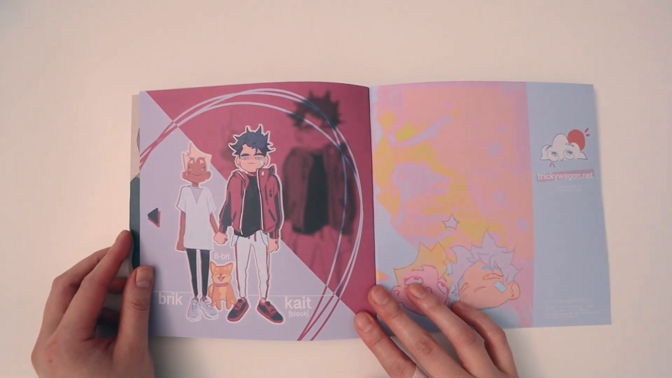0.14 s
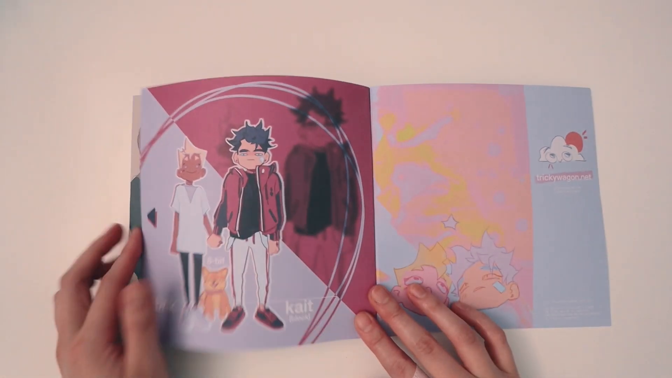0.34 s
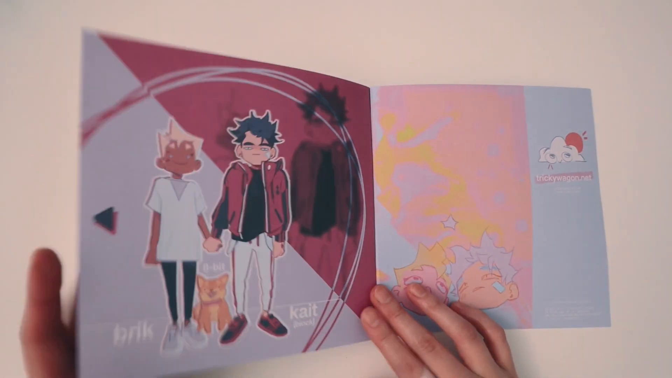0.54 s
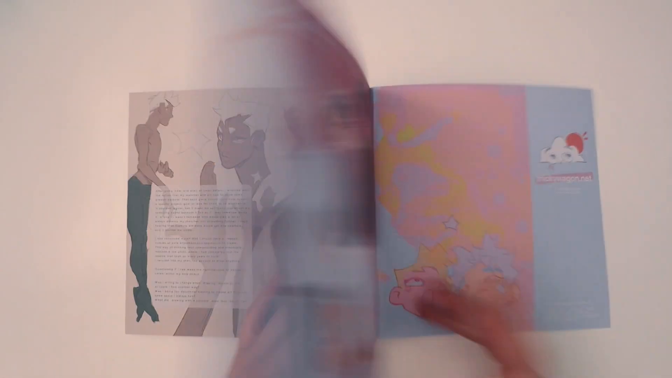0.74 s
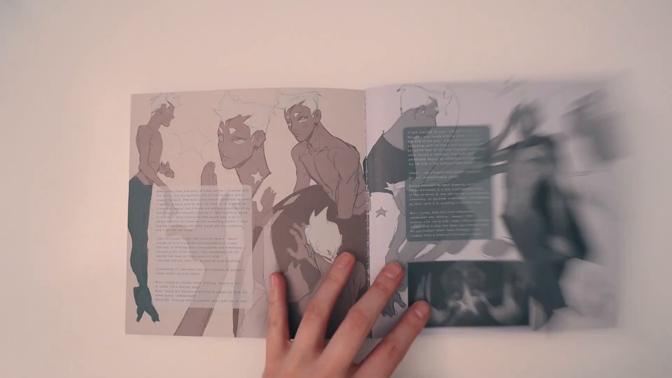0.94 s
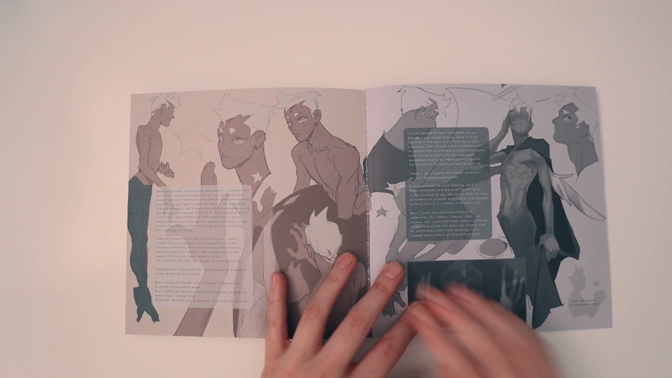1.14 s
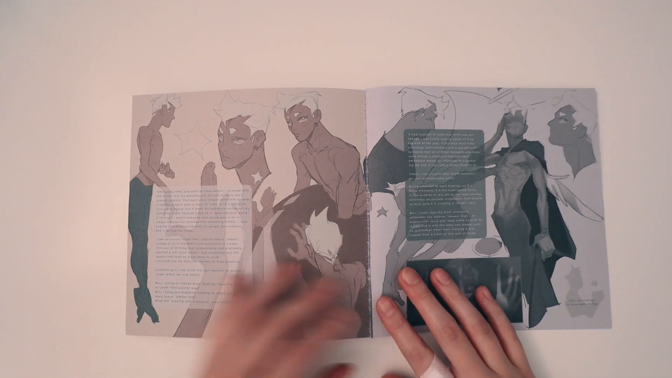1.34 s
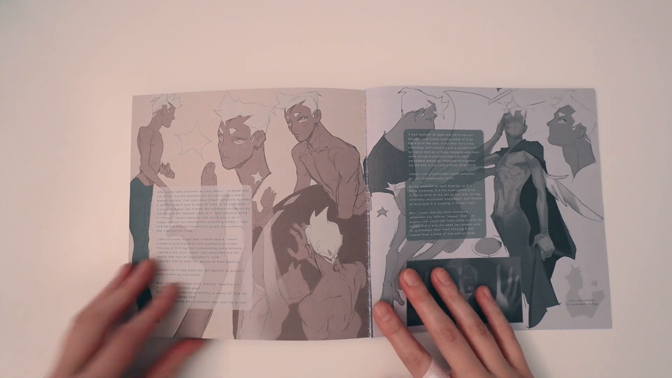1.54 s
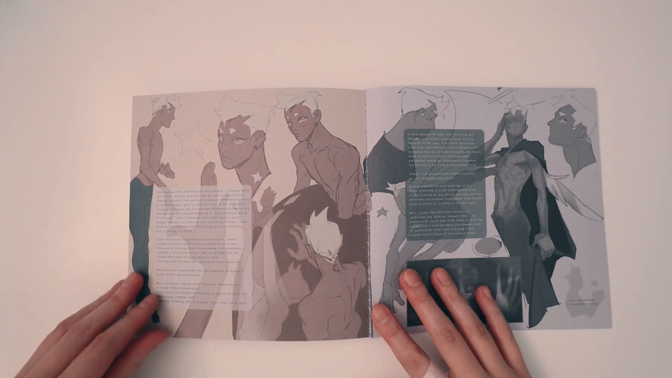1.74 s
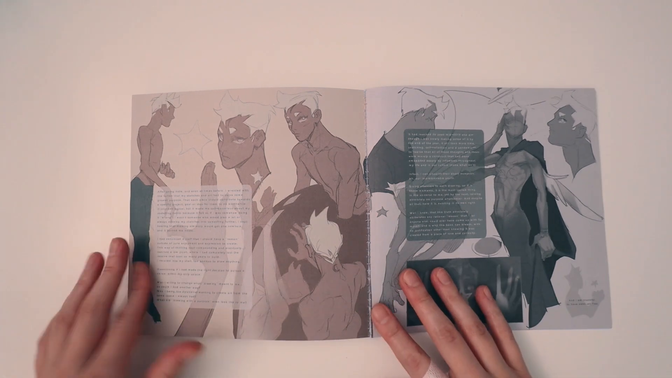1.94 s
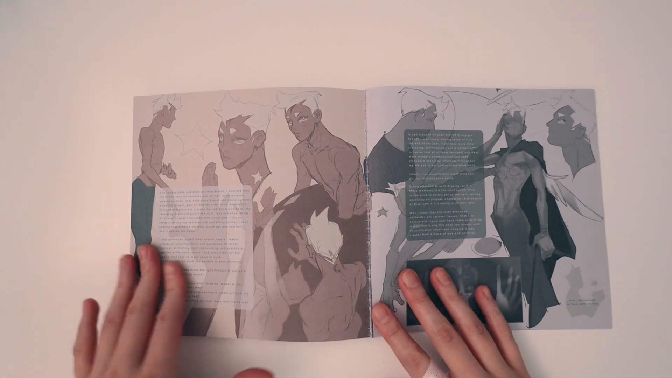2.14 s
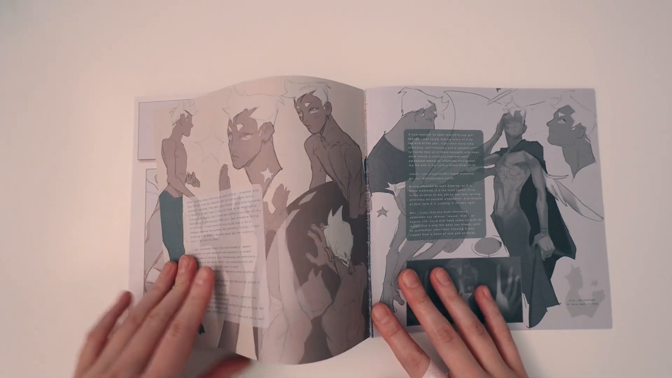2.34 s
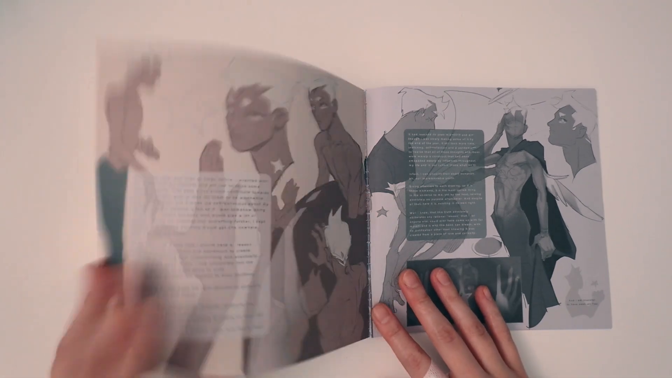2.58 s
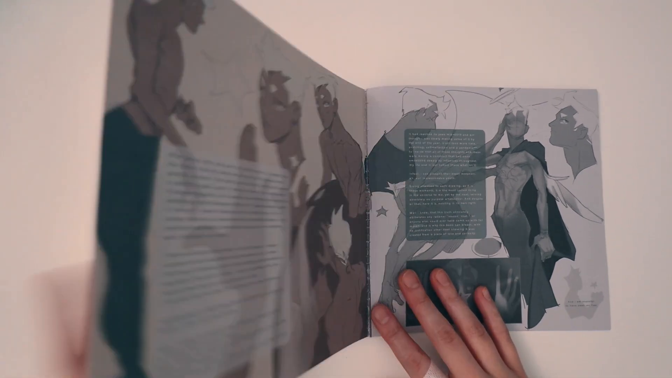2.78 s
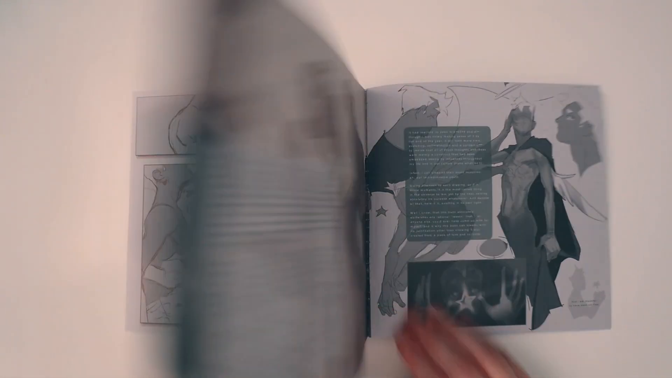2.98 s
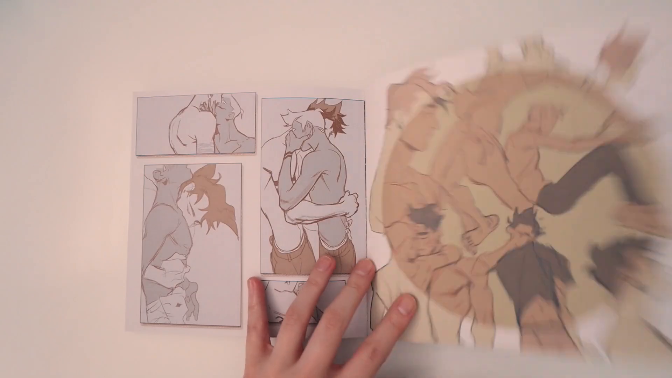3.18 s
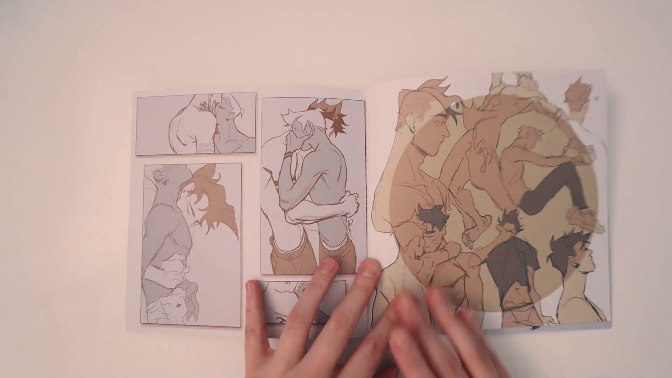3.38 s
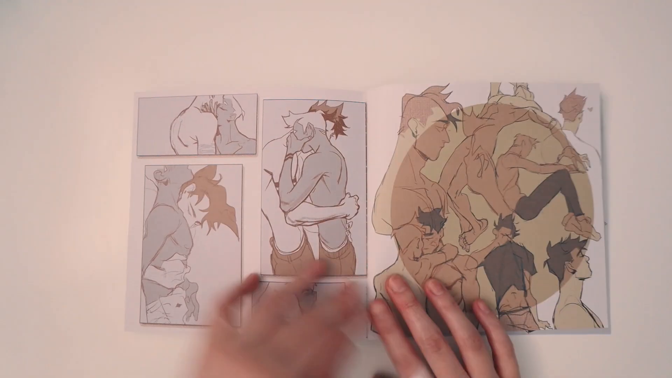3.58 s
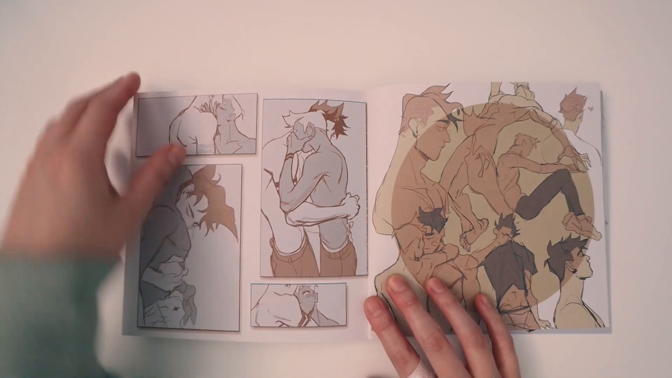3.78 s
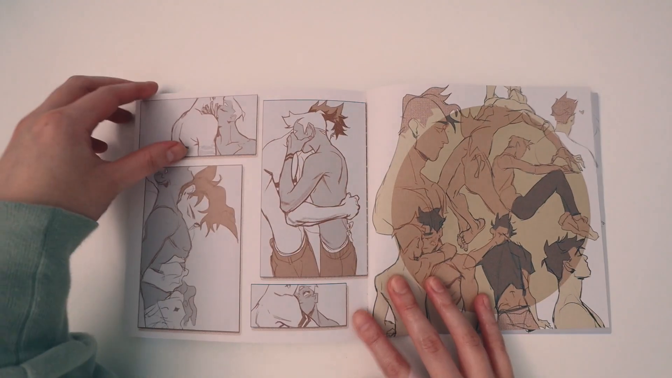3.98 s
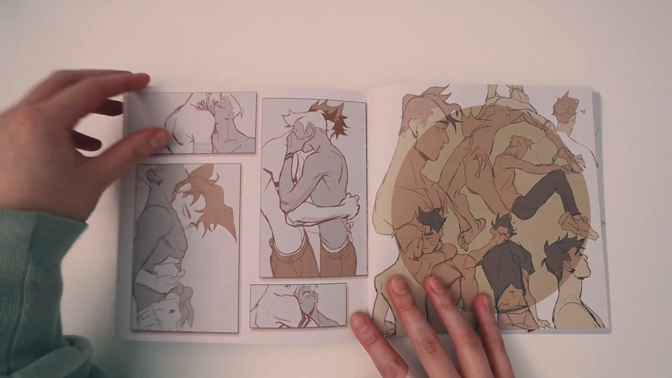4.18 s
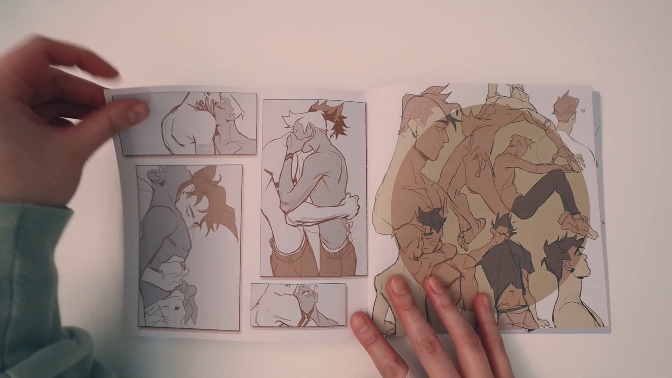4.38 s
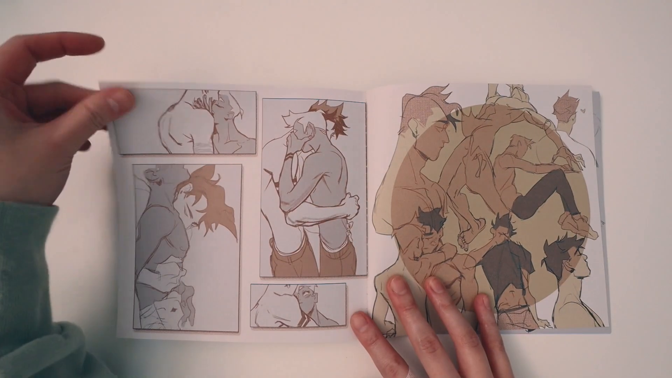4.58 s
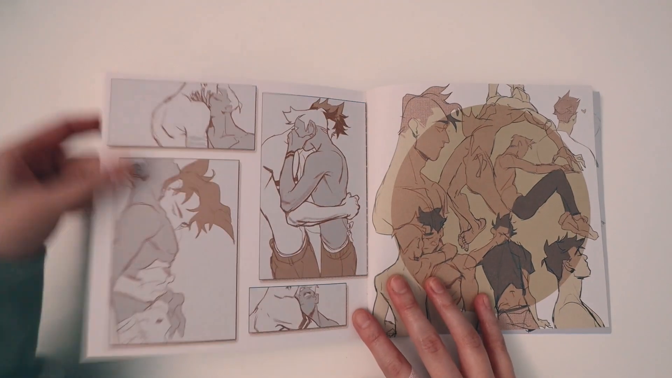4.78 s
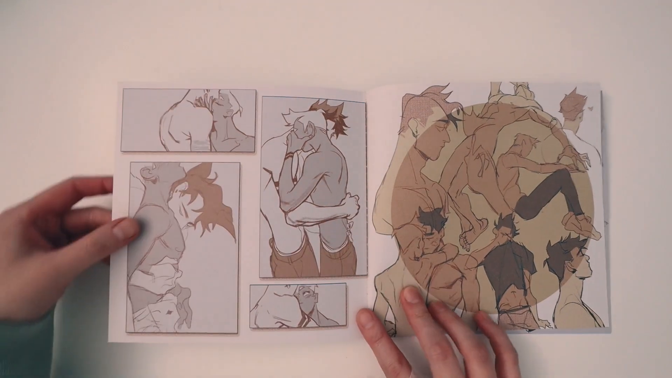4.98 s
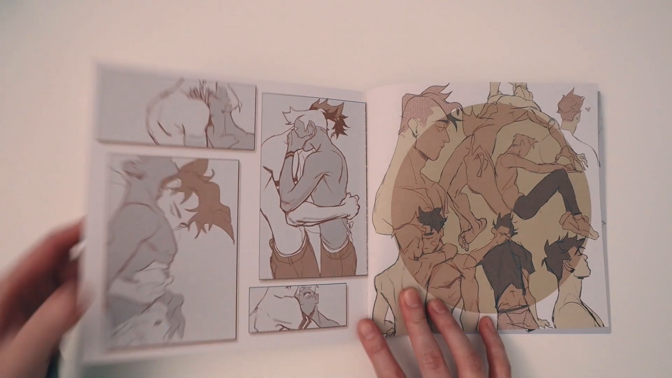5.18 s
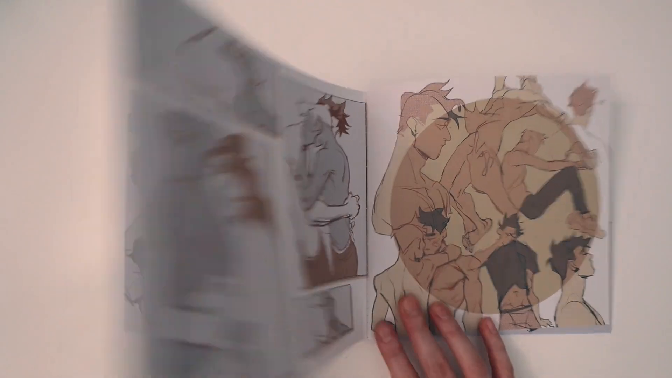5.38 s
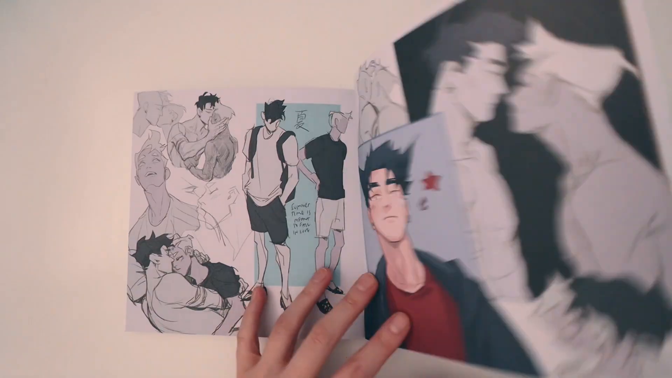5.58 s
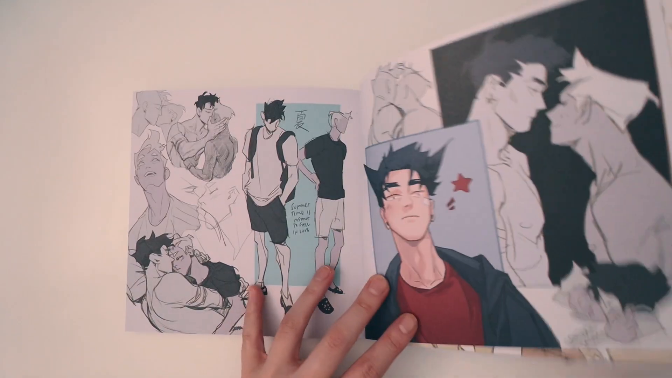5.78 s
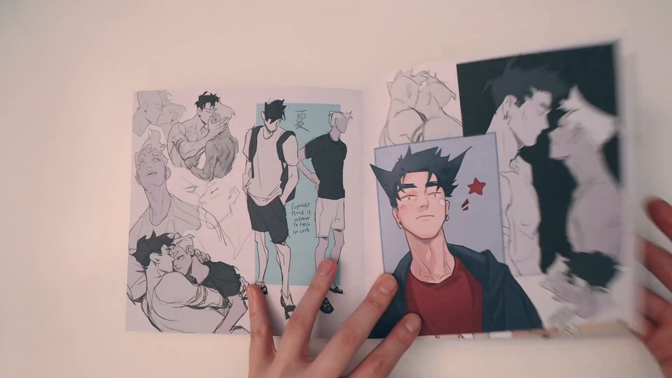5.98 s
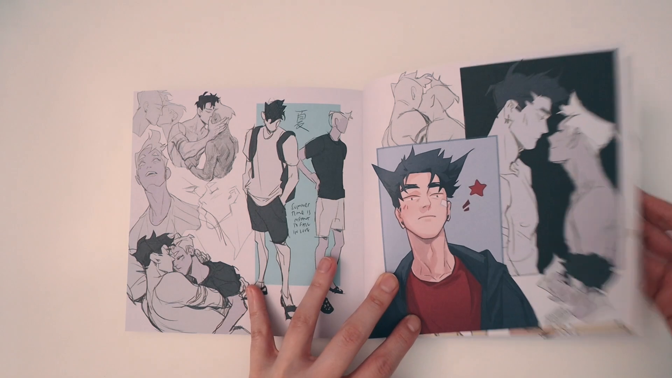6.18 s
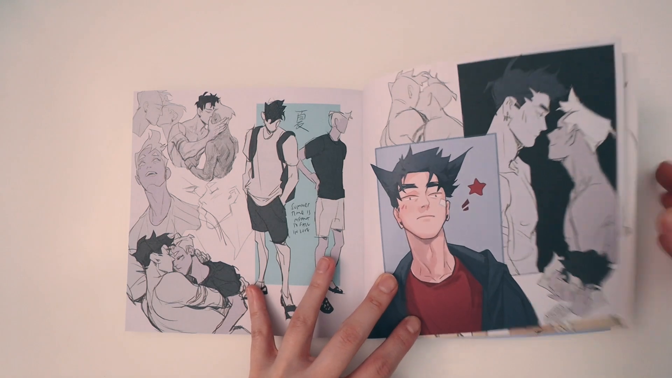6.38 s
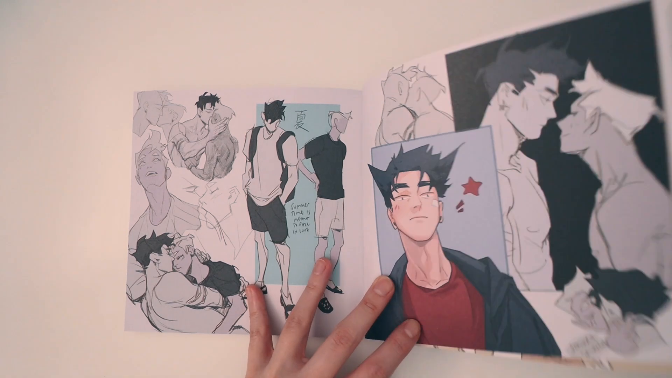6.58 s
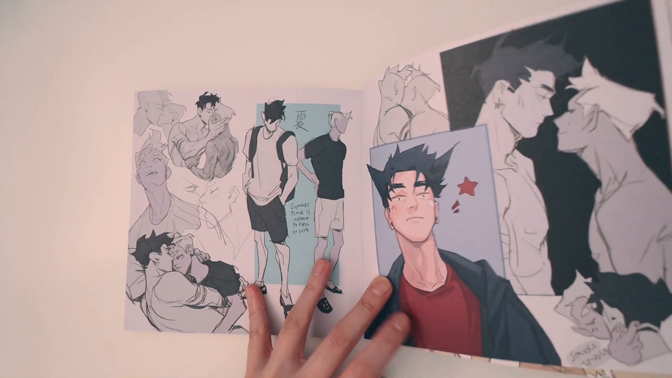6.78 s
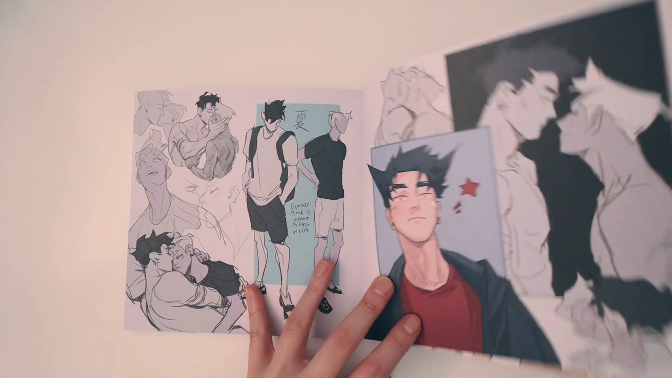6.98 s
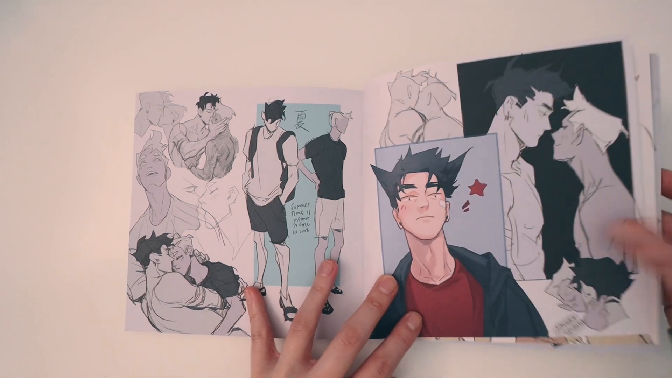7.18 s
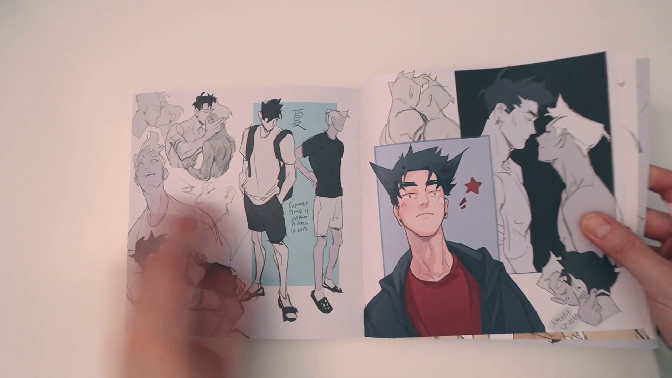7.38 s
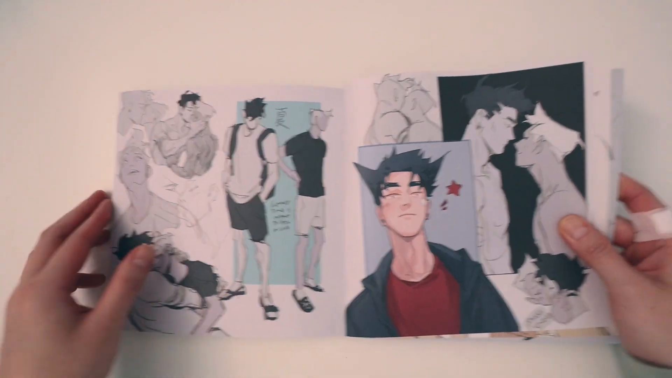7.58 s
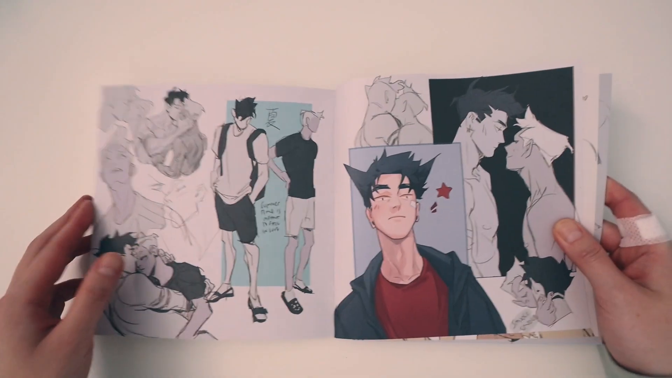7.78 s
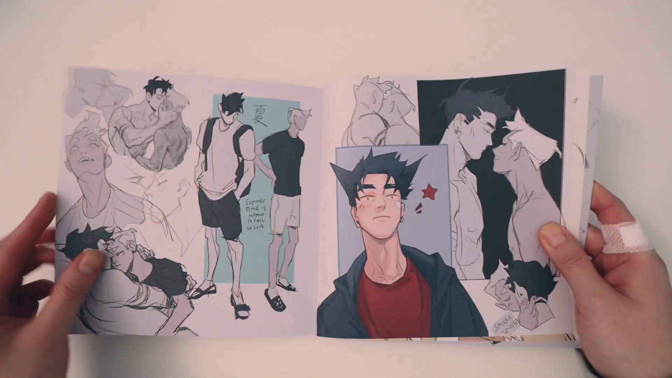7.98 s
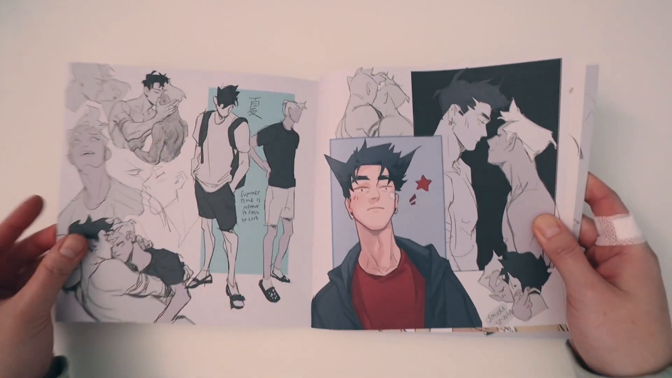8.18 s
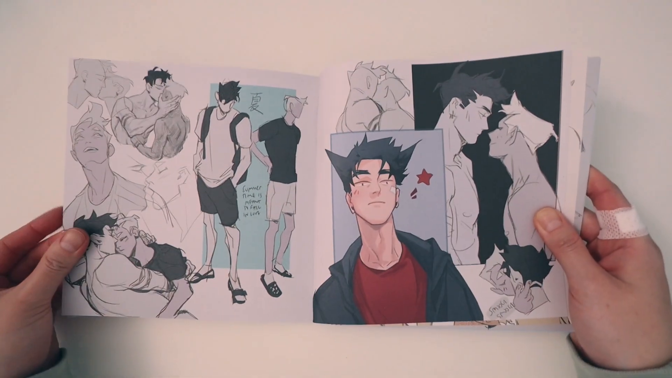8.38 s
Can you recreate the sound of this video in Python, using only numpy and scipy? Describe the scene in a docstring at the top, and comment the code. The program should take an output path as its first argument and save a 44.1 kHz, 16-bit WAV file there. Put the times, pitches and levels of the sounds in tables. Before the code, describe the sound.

Close stereo pickup of a paper book being handled on a desk, slight room reflection, low background hiss. Fingers rub the sheets, a page snaps over and is stroked flat; a sheet skids and buckles before a second, louder turn; quieter fumbling leads to a third. Then come irregular crinkles and a sharp snap with a thump as the held pages flex, ending in soft, dull dragging.

```python
"""A quiet, hissing room; then fingers slide over stiff pages of a picture book on a desk, close by.
Sheets hiss over their neighbours (filtered noise), pop and buckle (runs of ringing snaps) and skid (gliding noise);
edges tick (tiny bright snaps), fingertips thump the book (short decaying tones), palms smooth the turned pages.
At the end the book is dragged over the desk (duller noise). The desk rings along, and a small room answers."""
import sys
import numpy as np
from scipy import signal
from scipy.fft import rfft, irfft, next_fast_len
from scipy.io import wavfile
from scipy.ndimage import uniform_filter1d

SR = 44100
rng = np.random.default_rng(int(sys.argv[2]) if len(sys.argv) > 2 else 0)


def to_wav(sig):
    """Store sig (one row per channel, or 1-D mono) as 16-bit WAV at the path in sys.argv[1].

    Samples outside -1..1 are clipped; the rate is SR.
    """
    pcm = np.clip(np.atleast_2d(sig), -1, 1) * 32767
    pcm = np.round(pcm).astype(np.int16)
    wavfile.write(sys.argv[1], SR, pcm.T)  # frames by channels


N = 372644  # samples

SNAP_HZ = 1000  # a snap or crease of this pitch has its spectrum unshifted


def undb(db):
    """Decibels to gain."""
    return 10 ** (np.asarray(db) / 20)


def unit(x):
    """Scale to rms 1."""
    return x / np.sqrt(np.mean(x ** 2))


def clock(seconds):
    """Sample times of a stretch of sound."""
    return np.arange(max(int(seconds * SR), 8)) / SR


def add(out, s, x):
    """Mix a stereo sound in at time s."""
    i = int(np.clip(s * SR, 0, N - 1))
    out[:, i:i + x.shape[1]] += x[:, :N - i]


def colour(x, points, shift=1, tilt_db=0, size=2048):
    """Causal filter with the given spectrum, shifted in pitch and tilted per octave about 1024 Hz."""
    hz, db = np.transpose(points)
    octave = np.log2(np.maximum(np.arange(size // 2 + 1) * SR / size, 20))
    level_db = np.interp(octave, np.log2(hz * shift), db) + tilt_db * (octave - 10)
    # folding the cepstrum forward makes the filter minimum-phase
    cepstrum = irfft(np.log(undb(level_db)))
    cepstrum[1:size // 2] *= 2
    cepstrum[size // 2 + 1:] = 0
    impulse = irfft(np.exp(rfft(cepstrum)))
    return signal.fftconvolve(x, impulse[None], axes=1)


def walk(count, rate):
    """Smooth chance with a spread near 1, taking a new value rate times a second."""
    k = max(int(SR / rate), 1)
    steps = np.repeat(rng.standard_normal(count // k + 1), k)
    return uniform_filter1d(steps, k)[:count] * np.sqrt(2)


def diffuse(count, apart_hz=700):
    """Noise from all sides: the two ports agree in the bass and part in the treble."""
    mid, side = rng.standard_normal((2, count))
    side = signal.sosfilt(signal.butter(1, apart_hz, "high", fs=SR, output="sos"), side)
    return np.array([mid + side, mid - side])


# noise spectrum of the idle room and microphone: [f/Hz, relative level/dB]
AIR = [(25, 5.5), (202, 3), (543, -6.5), (1150, -7.5), (3830, -15), (9270, -30.5), (11200, -26),
       (13100, -41), (15000, -53)]
AIR_DB = -58


def air(waver_db=1.26):
    """The quiet room and the microphone's hiss: coloured noise with a slowly wavering level."""
    return unit(colour(diffuse(N), AIR)[:, :N]) * undb(AIR_DB + waver_db * walk(N, rate=4.6))


# fingers slide a sheet over its neighbour: [t of the peak/s, level/dB, length/s, tilt/(dB per octave)]
SWIPES = [(0.326, -59, 0.12, -0.5), (0.543, -46, 0.074, -2), (1.336, -53.5, 0.15, 10),
          (1.917, -56.5, 0.052, 1), (2.123, -62, 0.3, 2.5), (2.66, -39, 0.14, -1), (3.221, -52, 0.2, -0.1),
          (4.009, -58, 0.1, 2), (4.4, -48.5, 0.04, -0.5), (4.92, -51, 0.19, -1), (5.4, -46.5, 0.16, 0.5),
          (6.068, -60.5, 0.1, -2), (6.626, -53, 0.38, -0.5), (7.347, -56, 0.22, 1),
          (8.069, -59.5, .045, 0.3), (8.422, -71, .045, -1)]
# a sheet passes over the spine, then a palm flattens it:
# [t when upright/s, swish level/dB, wait for the palm/s, palm tilt/(dB per octave)]
TURNS = [(.80, -47.5, .74, 3.5), (3.03, -47.5, .56, 4), (5.49, -46, .59, -2)]
SWISH_RISE_S, SWISH_FALL_S, SWISH_TILT_DB = .15, 0.13, 1.5
FLATTEN_S, FLATTEN_DB = 0.21, -53.5


def page_strokes():
    """Fingers slide the sheets; each turn swishes over the spine and is flattened by a palm."""
    strokes = [slide(*row) for row in SWIPES]
    for s, db, wait, tilt_db in TURNS:
        strokes.append((s, db, SWISH_RISE_S, SWISH_FALL_S, SWISH_TILT_DB))
        strokes.append(slide(s + wait, FLATTEN_DB, FLATTEN_S, tilt_db))
    return strokes


# noise spectrum of paper rubbing on paper: [f/Hz, relative level/dB]
RUB = [(200, -13.5), (500, -15), (1000, 3), (4500, -0.5), (7000, -5.5), (11000, -7.5), (12500, -7),
       (15000, -44)]


def rubbing_pages():
    """Sheets, fingers and palms rub on paper, a bright judder of fibre slips."""
    return friction(page_strokes(), RUB, grain_db=2.5, judder_db=2.0, width=0.38)


RISE_SHARE = .47  # of a stroke's length


def slide(s, db, length, tilt_db):
    """A hand stroke that speeds up and slows down within its length."""
    return s, db, length * RISE_SHARE, length * (1 - RISE_SHARE), tilt_db


def stroke(s, rise, fall, flatness=1.5):
    """Times around the peak of a hand stroke, and the hand's speed at each."""
    lead = min(s, rise * 2)
    t = clock(lead + fall * 2) - lead
    return t, np.exp(-np.abs(t / np.where(t < 0, rise, fall)) ** flatness)


def rasp(count, patches, grain_db):
    """Tiny slips on each patch of a sheet, with forces that vary together."""
    return rng.standard_normal((patches, count)) * undb(grain_db * walk(count, rate=2500))


def friction(strokes, spectrum, grain_db, judder_db, width, count=3):
    """Fibres catch and slip by the thousand; the stroke swells, judders and dies with the hand's speed."""
    out = np.zeros((2, N))
    for s, db, rise, fall, tilt_db in strokes:
        t, speed = stroke(s, rise, fall)
        slips = rasp(len(t), count, grain_db)
        hiss = unit(ports(colour(slips, spectrum, tilt_db=tilt_db), s, width)[:, :len(t)])
        add(out, s + t[0], hiss * speed * undb(db + judder_db * walk(len(t), rate=67.4)))
    return out


# places run from -1 right to 1 left
LIFT_PLACE, LAND_PLACE, DRAG_PLACE = -0.61, 0.76, 0.26
CROSS_S, STAY_S, RETURN_S = 0.43, 0.33, 0.45


def place_at(s):
    """The sound crosses with each sheet, stays, follows the hand back; at last the whole book is in the middle."""
    path = []
    for upright, *_ in TURNS:
        landed = upright + CROSS_S / 2
        leaves = landed + STAY_S
        path += [(landed - CROSS_S, LIFT_PLACE), (landed, LAND_PLACE)]
        path += [(leaves, LAND_PLACE), (leaves + RETURN_S, LIFT_PLACE)]
    pushed = DRAGS[0][0]
    path[-2:] = [(pushed - RETURN_S, LAND_PLACE), (pushed, DRAG_PLACE)]  # the last sheet stays in the hand
    return np.interp(s, *np.transpose(path))


PORT_LAG_S, PORT_DB = 0.00018, 4.5  # between the two ports, for a sound at place 1


def ports(x, s, width):
    """Patches of a sheet lie side by side; each reaches the nearer port earlier and louder."""
    place = place_at(s) + width * np.linspace(-1, 1, len(x))
    size = next_fast_len(x.shape[1] + 64)
    spectrum, hz = rfft(x, size), np.arange(size // 2 + 1) * SR / size
    lead = place[:, None] / 2 * (np.log(undb(PORT_DB)) + 2j * np.pi * hz * PORT_LAG_S)
    return np.array([irfft((spectrum * np.exp(side * lead)).sum(0), size) for side in (1, -1)])


# a whole sheet pops over or lands: [t/s, level/dB, f/Hz, rebound re level/dB, rebound length/s,
# edge tick level/dB, thump level/dB]
FLOPS = [(0.559, -29, 940, -7.5, 0.035, -52, -60), (.929, -22.5, 1220, -11, 0.015, -28, -66),
         (2.684, -26.5, 1510, 2, .022, -25.5, -43), (2.764, -30.5, 890, -25, 0.026, -40, -36),
         (2.941, -29.5, 1210, 4, .015, -31, -24), (5.667, -35, 930, -8, .036, -59, -34),
         (5.806, -25.5, 1440, -1.5, .035, -37, -37)]
# spectrum of a snapping sheet at SNAP_HZ: [f/Hz, relative level/dB]
SNAP = [(40, -17.5), (220, -9.5), (450, -5), (750, 2), (1100, 1), (1650, -1.5), (2500, -14), (4000, -25),
        (16000, -53)]
FLOP_S, FLOP_THUMP_HZ, EDGE_LEAD_S = .018, 235, .004
REBOUND_AFTER_S, REBOUND_PITCH = .018, 0.7  # pitch as a ratio to the first pop


def flops():
    """The edge ticks, the sheet pops through and thumps the stack, then rebounds at a lower pitch."""
    pops, edges, blows = [], [], []
    for s, db, hz, rebound_db, rebound_s, edge_db, thump_db in FLOPS:
        pops.append((s, db, FLOP_S, hz))
        pops.append((s + REBOUND_AFTER_S, db + rebound_db, rebound_s, hz * REBOUND_PITCH))
        edges.append((s - EDGE_LEAD_S, edge_db))
        blows.append((s + EDGE_LEAD_S, thump_db, FLOP_THUMP_HZ))
    return flexes(pops, SNAP) + ticks(edges) + thumps(blows)


def flexes(rows, spectrum, small=False):
    """A bent sheet pops through in snaps, coloured at its pitch; slow bends snap more sparsely."""
    out = np.zeros((2, N))
    for s, db, length, hz in rows:
        rate = 60 / np.sqrt(length)  # snaps per second
        snaps = crackle(length, rate, scatter_db=4.0, first=0.75, ring_s=.0035, ring=0.89, alike=small)
        pop = ports(colour(snaps, spectrum, hz / SNAP_HZ), s, width=0.27)
        add(out, s, burst(pop, db, length))
    return out


def crackle(length, rate, scatter_db, first, ring_s, ring, alike=False, count=3, fade_db=-6):
    """One snap sets off a dying run of others on a few patches, each ringing briefly in dense modes."""
    t = clock(length + 6 * ring_s)
    snaps = np.zeros((count, len(t)))
    n = int(length * rate) + 2
    due = (np.arange(n) + rng.random(n)) / n  # share of the length
    when = (due * length * SR).astype(int)
    size = undb(scatter_db * rng.standard_normal(n) + fade_db * due) * rng.choice([-1, 1], n)
    when[0], size[0] = 10, first
    snaps[rng.integers(count, size=n), np.minimum(when, len(t) - 1)] = size
    # noise tails stand for the modes: one per patch, or one for all if alike
    tail = rng.standard_normal((1 if alike else count, len(t))) * np.exp(-t / ring_s)
    tail *= ring / np.linalg.norm(tail, axis=1, keepdims=True)
    tail[:, 0] = 1
    return signal.fftconvolve(snaps, tail, axes=1)[:, :len(t)]


def burst(x, db, length):
    """Give a burst the energy of level db held for its length."""
    return x * undb(db) * np.sqrt(2 * length * SR / np.sum(x ** 2))


# a fingertip or the book's edge lands: [t/s, peak level before panning/dB, f/Hz]
THUMPS = [(.781, -38.5, 195), (1.408, -47, 217), (1.944, -41.5, 99), (2.131, -42, 151), (2.775, -31.5, 137),
          (3.475, -43, 135), (3.653, -46.5, 107), (3.905, -43, 195), (4.046, -46.5, 207),
          (4.853, -41.5, 210), (4.924, -40, 220), (6.254, -33.5, 230.5), (6.629, -28.5, 271),
          (6.892, -37, 210), (7.305, -33.5, 356), (7.388, -31.5, 323), (8.122, -39, 216)]


def thumps(rows, cycles=0.81, pat=0.36):
    """A soft landing rocks the page stack for a cycle or two, with a small pat of skin on paper."""
    out, t = np.zeros((2, N)), clock(0.071)
    for s, db, hz in rows:
        age = 2 * hz * t / cycles  # the swell peaks at age 1
        skin = unit(colour(rng.standard_normal((1, len(t))), SNAP, 2 * hz / SNAP_HZ)[:, :len(t)])
        thud = age * np.exp(1 - age) * (np.sin(2 * np.pi * hz * t) + pat * skin)
        add(out, s, undb(db) * ports(thud / np.abs(thud).max(), s, width=0))
    return out


# a held sheet buckles: [t/s, level/dB, length/s, f/Hz]
BUCKLES = [(0.953, -25, 0.0041, 1550), (0.997, -40, 0.03, 1060), (1.261, -42.5, 0.01, 1180),
           (1.301, -39, 0.0058, 1550), (1.356, -36.5, 0.0034, 1400), (2.49, -43.5, 0.035, 660),
           (2.61, -36.5, 0.0057, 1250), (2.626, -38, 0.011, 950), (2.834, -39.5, 0.031, 710),
           (3.199, -44.5, 0.0074, 1110), (3.477, -42, 0.014, 1280), (3.522, -47.5, 0.019, 1180),
           (4.82, -55.5, 0.036, 616), (4.877, -48, 0.0028, 1160), (4.972, -47, 0.0051, 1100),
           (5.289, -53.5, 0.069, 500), (5.531, -38, 0.0091, 920), (5.562, -46.5, 0.041, 1110),
           (5.899, -26, 0.0064, 970), (6.249, -35.5, 0.0056, 510), (6.627, -19, 0.0016, 1450),
           (6.633, -36, 0.00505, 470), (6.721, -33.5, 0.012, 1290), (6.773, -33, 0.0057, 1490),
           (6.841, -35.5, 0.0098, 1200), (6.881, -31.5, 0.014, 1620), (6.924, -31.5, 0.0058, 1270),
           (7.013, -44.5, 0.023, 1360), (7.104, -42, 0.0073, 870), (7.268, -42.5, 0.012, 970),
           (7.386, -40.5, 0.0063, 960)]
# spectrum of a small crease at SNAP_HZ: [f/Hz, relative level/dB]
CREASE = [(60, -25), (220, -7.5), (450, -13), (750, 2), (1400, -2.5), (1950, -9), (3500, -21.5),
          (16000, -64)]
# the edge's flick: level at SNAP_HZ, and rise per octave of the buckle's pitch
FLICK_DB, FLICK_DB_PER_DOUBLING = -51, 15
# a sliding sheet also crinkles faintly, most under a dull, hard-pressed stroke (dB, and dB per unit of tilt)
CRINKLE_DB, CRINKLE_PER_TILT = -66, -6.5


def buckles():
    """Single buckles flick the edge, hardest when high-pitched; sliding sheets crinkle faintly."""
    crinkles = [bulge(s - length / 2, CRINKLE_DB + CRINKLE_PER_TILT * tilt_db, length)
                for s, _, length, tilt_db in SWIPES]
    flicks = [(s, FLICK_DB + FLICK_DB_PER_DOUBLING * np.log2(hz / SNAP_HZ)) for s, _, _, hz in BUCKLES]
    creases = flexes(BUCKLES, CREASE, small=True)
    return creases + flexes(crinkles, SNAP, small=True) + ticks(flicks)


BULGE_S, BULGE_HZ, BULGE_SLOPE = 0.23, 830, 0.67  # reference length, its pitch, power of the length


def bulge(s, db, length):
    """A longer stroke bends a larger bulge, which crinkles lower."""
    return s, db, length, BULGE_HZ * (BULGE_S / length) ** BULGE_SLOPE


# a page edge or a nail catches: [t/s, level/dB]
TICKS = [(1.044, -44), (1.3052, -23), (1.359, -41.5), (2.746, -32.5), (2.813, -39.5), (2.839, -37),
         (3.656, -40.5), (4.374, -42), (4.405, -40), (4.6016, -43), (4.818, -50), (5.76, -34.5),
         (5.796, -29.5), (6.84, -36), (7.182, -45.5), (7.266, -36)]
# spectrum of a flicking edge: [f/Hz, relative level/dB]
EDGE = [(200, -6.5), (1000, 9), (4500, 6), (7500, -4), (11000, -7.5), (13000, -7), (16000, -55)]
TICK_S = 0.0034


def ticks(rows):
    """A cut edge catches and flicks free in a few tiny, bright slips."""
    out = np.zeros((2, N))
    for s, db in rows:
        slips = crackle(TICK_S, rate=1500, scatter_db=2.5, first=0.53, ring_s=0.0024, ring=0.043)
        add(out, s, burst(ports(colour(slips, EDGE), s, width=0.36), db, TICK_S))
    return out


# an arching sheet breaks loose and skids over its neighbour: [t of the start/s, length/s, level/dB,
# air pocket's f at the start/Hz, its glide/(octaves per s), dry hiss re level/dB]
SKIDS = [(2.225, 0.11, -30.5, 3500, -12.5, -1), (2.435, 0.098, -36, 3500, 0, 2),
         (4.53, 0.037, -45.5, 2700, 1.5, -19), (4.591, 0.11, -37.5, 2720, 4.5, -21.5)]
SKID_ATTACK_S, SKID_RELEASE_S, HISS_DELAY_S = 0.034, 0.014, 0.013
POCKET_FADE_S = 0.098  # the hollow note dies as the arch opens


def skids(width=1.0, judder_db=1.24, grain_db=3, count=3):
    """The sliding edge rasps, coloured by the pocket of air under the arch, which glides in pitch and fades."""
    out = np.zeros((2, N))
    for s, length, db, hz, glide, hiss_db in SKIDS:
        t = clock(length + 6 * SKID_RELEASE_S)
        rubbed = colour(rasp(len(t), count, grain_db), RUB)[:, :len(t)]
        f, at, frames = signal.stft(rubbed, SR)
        ratio = np.maximum(f, 1)[:, None] / (hz * 2 ** (glide * at))
        pocket = 1 / (1 + (np.abs(ratio - 1 / ratio) / width) ** 2)  # gliding resonance
        hollow = unit(ports(signal.istft(frames * pocket, SR)[1], s, width=0.39)[:, :len(t)])
        dry = unit(ports(colour(rasp(len(t), count, grain_db), RUB, tilt_db=2.5), s, width=0.43)[:, :len(t)])
        note = hollow * np.exp(-t / POCKET_FADE_S) * skid_speed(t, length)
        hiss = undb(hiss_db) * dry * skid_speed(t - HISS_DELAY_S, length - HISS_DELAY_S)
        add(out, s, (note + hiss) * undb(db + judder_db * walk(len(t), rate=126)))
    return out


def skid_speed(t, length):
    """A skid gets quickly up to speed, holds it and stops short."""
    return np.clip(t / SKID_ATTACK_S, 0, 1) * np.exp(-np.maximum(t - length, 0) / SKID_RELEASE_S)


# the book and the hands drag over the desk: [t of the peak/s, level/dB, length/s]
DRAGS = [(7.619, -46, 0.2), (7.96, -48, 0.19), (8.194, -51, .13)]
# noise spectrum of the drag: [f/Hz, relative level/dB]
DRAG = [(80, -22), (298, -13.5), (520, -6.5), (1210, -2.5), (6110, -27.5), (15000, -49)]
DRAG_TILT_DB = 1  # per octave


def dragging_book():
    """Book and hands drag over the desk, a broad and duller friction."""
    strokes = [slide(*row, DRAG_TILT_DB) for row in DRAGS]
    return friction(strokes, DRAG, grain_db=1.5, judder_db=1.15, width=0.71)


# the book lying on the desk: [f/Hz, gain at resonance/dB, t60/s]
DESK_MODES = [(71.7, 11, 0.19), (203, 8.5, 0.062), (332.3, 10.5, 0.23)]


def desk(x):
    """Whatever shakes the book also rings the desk beneath it, in a few decaying modes."""
    t = clock(.5)
    ring = 0
    for hz, db, t60 in DESK_MODES:
        decay = np.log(1000) / t60
        ring = ring + undb(db) * 2 * decay / SR * np.exp(-decay * t) * np.cos(2 * np.pi * hz * t)
    return x + signal.fftconvolve(x.mean(0), ring)[:N]


# the room's decay: [f/Hz, t60/s]
ROOM_T60 = [(300, 0.46), (750, 0.3), (12000, 0.1)]
ROOM_DB, EARLY_DB = -11, -5


def reflections(early_s=0.0022, count=8):
    """Desk and near walls answer at once; a short diffuse tail follows, alike at both ports in the bass."""
    t = clock(.5)
    hz, t60 = np.transpose(ROOM_T60)
    edges = np.geomspace(60, 16000, count + 1)  # Hz
    tail = 0
    for lo, hi in zip(edges, edges[1:]):
        band = signal.sosfilt(signal.butter(2, [lo, hi], "band", fs=SR, output="sos"), diffuse(len(t)))
        band_t60 = np.interp(np.log(lo * hi) / 2, np.log(hz), t60)
        tail = tail + band * undb(-60 * t / band_t60)
    tail = tail * np.clip(t / 0.011, 0, 1) ** 2
    early = diffuse(len(t)) * np.exp(-t / early_s) * (t > .002)
    return (undb(ROOM_DB) * unit(tail) + undb(EARLY_DB) * unit(early)) / np.sqrt(len(t))


def room(x, count=6, size=1024):
    """Short overlapping slices take turns through several random reflection patterns, keeping the tail even."""
    patterns = [reflections() for _ in range(count)]
    middle = x.mean(0)
    out, sent = x.copy(), middle + (x - middle) / 2  # half the stereo width
    fade = np.sin(np.pi * np.arange(size) / size)
    for k, i in enumerate(range(0, N - size, size // 2)):
        add(out, i / SR, signal.fftconvolve(sent[:, i:i + size] * fade, patterns[k % count], axes=1))
    return out


def scene():
    """Paper, hands and desk in the room."""
    paper = rubbing_pages() + flops() + buckles() + skids()
    touches = thumps(THUMPS) + ticks(TICKS)
    return room(desk(paper + touches + dragging_book())) + air()


TOP_HZ = 15650


def record(dry):
    """A steep low-pass removes everything above TOP_HZ."""
    return signal.sosfilt(signal.ellip(8, .2, 70, TOP_HZ, fs=SR, output="sos"), dry)


dry = scene()
out = record(dry)
to_wav(out)
```